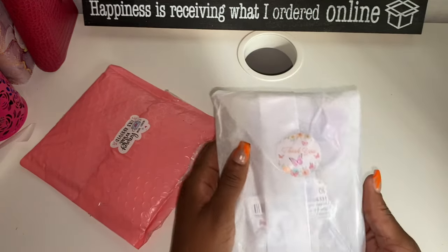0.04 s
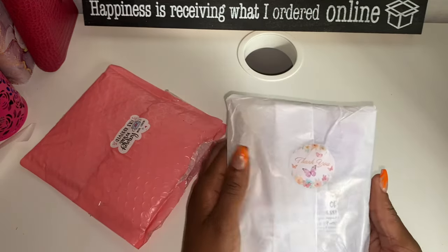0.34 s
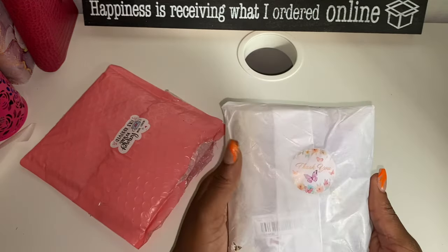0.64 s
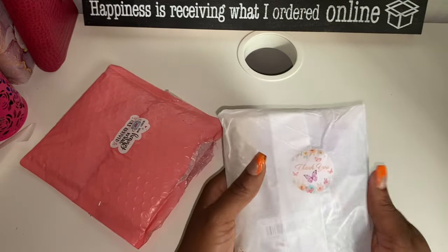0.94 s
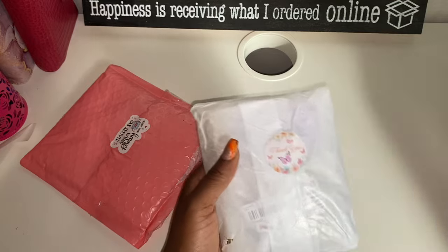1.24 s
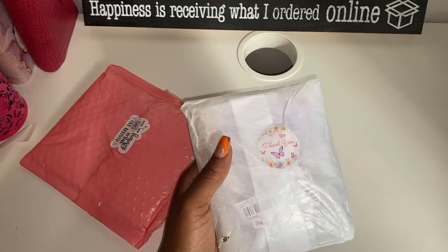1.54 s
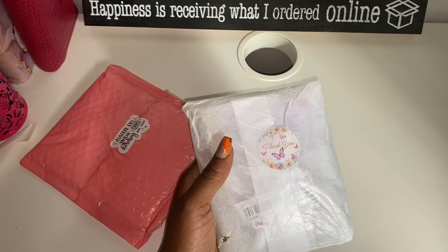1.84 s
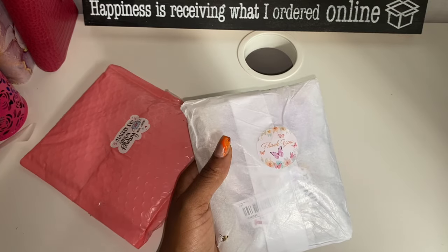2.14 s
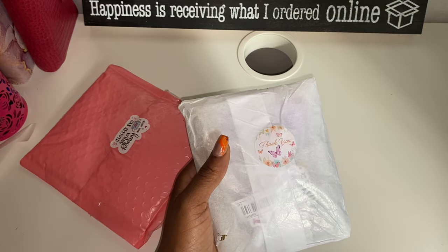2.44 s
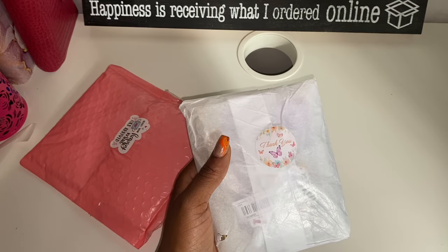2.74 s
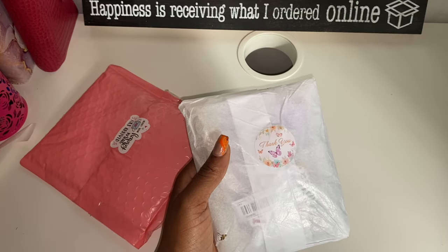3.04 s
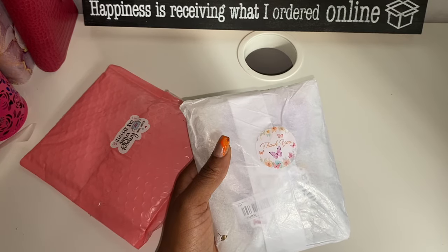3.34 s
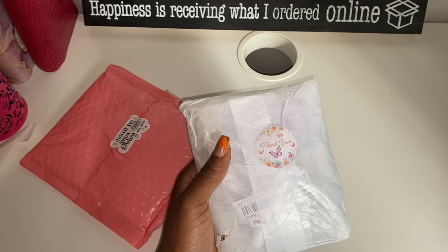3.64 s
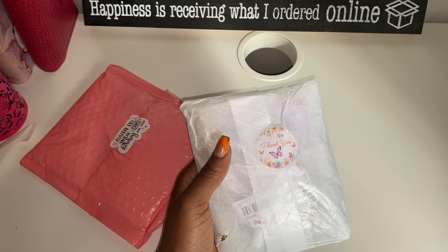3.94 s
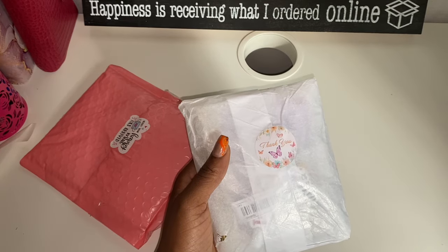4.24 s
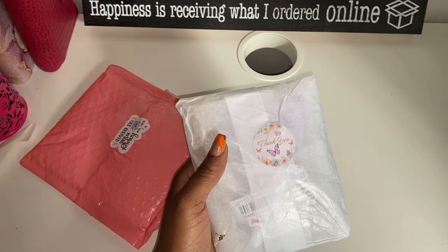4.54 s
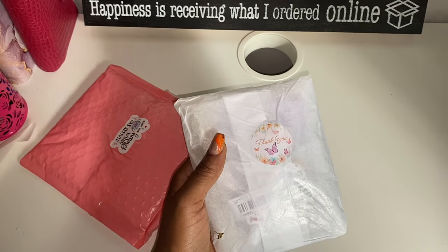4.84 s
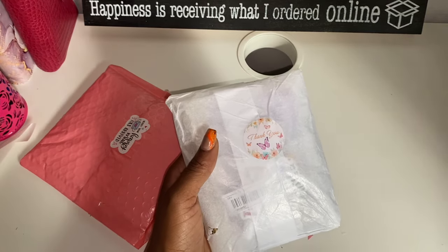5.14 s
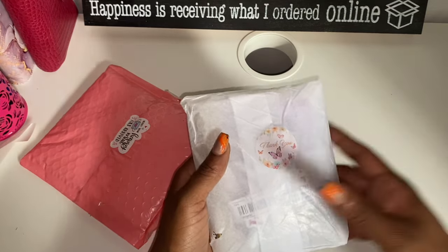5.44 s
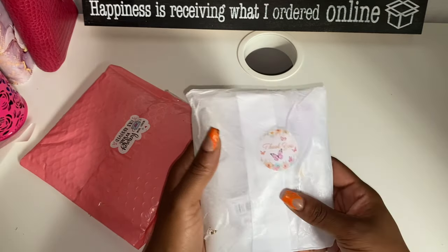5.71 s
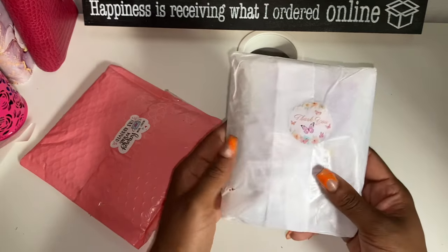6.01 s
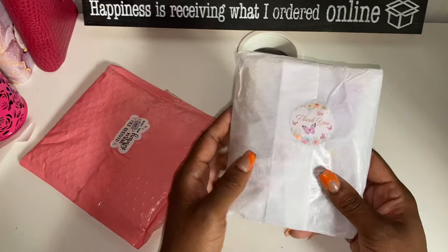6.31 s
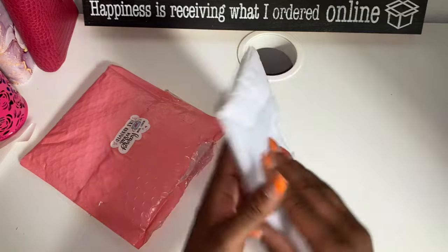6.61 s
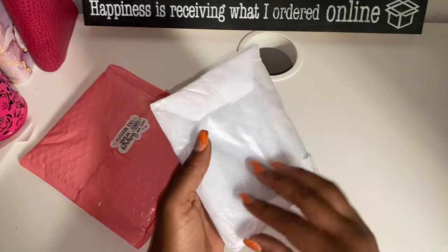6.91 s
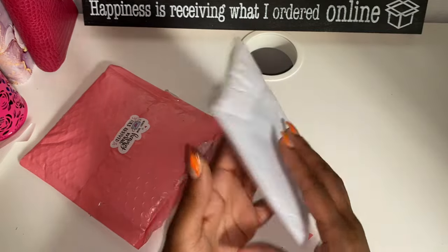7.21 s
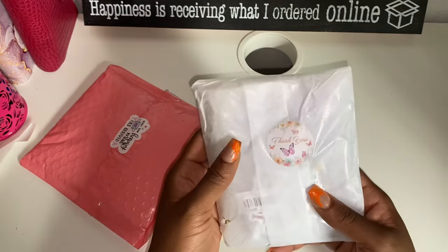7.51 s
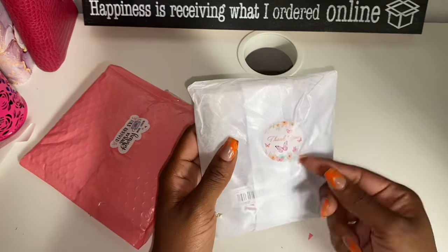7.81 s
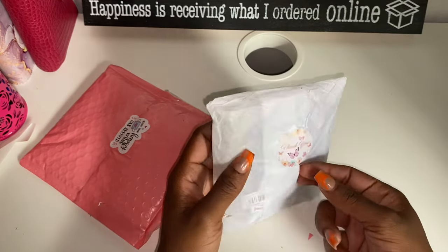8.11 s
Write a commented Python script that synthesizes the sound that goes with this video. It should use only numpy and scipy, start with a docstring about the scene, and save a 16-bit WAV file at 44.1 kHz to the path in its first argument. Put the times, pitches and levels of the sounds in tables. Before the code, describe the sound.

Hands squeeze a soft parcel wrapped in tissue paper, making it hiss, crinkle and snap. Something knocks onto a desk and slides briefly. A quiet stretch follows, with faint swishes, a scuff and a few small knocks. Then the parcel is turned over, crackling again, bumps softly on the desk and keeps rustling. It is all close to a stereo microphone in a small room with a low rumble.

```python
"""A soft parcel in tissue paper is squeezed over a desk, close to a stereo microphone, in a small room
with a low rumble. Fingers hiss over the sheet, creases buckle in swarms of clicks and larger folds snap.
At 1.5 s the free hand knocks something onto the desk and pushes it along. The parcel then rests in one
hand, amid faint swishes, dull swells, a scuff and a few knocks. From 5.4 s it is turned over and back,
crackling again, and bumps down at 7 s; the level dips briefly twice and the rustling goes on."""
import sys
import numpy as np
from scipy import signal
from scipy.fft import rfft, irfft, next_fast_len
from scipy.io import wavfile
from scipy.ndimage import uniform_filter1d

SR = 44100
rng = np.random.default_rng(int(sys.argv[2]) if len(sys.argv) > 2 else 0)


def transcribe(signal):
    """Save signal, clipped to [-1, 1], as a 16-bit WAV file at the path in sys.argv[1]."""
    frames = np.atleast_2d(signal).T
    limited = np.clip(frames, -1, 1)
    pcm = np.round(limited * 32767).astype(np.int16)
    wavfile.write(sys.argv[1], SR, pcm)


N = 364266
TIME = np.arange(N) / SR


def from_db(db):
    """Decibels to gain."""
    return 10 ** (np.asarray(db) / 20)


def rms_one(x):
    """Scale to an rms of one."""
    return x / np.sqrt(np.mean(x ** 2) + 1e-20)


def at_hz(points, size):
    """Read a frequency curve on the bins of an FFT."""
    hz, value = np.transpose(points)
    return np.interp(np.log(np.arange(size // 2 + 1) * SR / size + 1), np.log(hz), value)


def colour(x, spectrum):
    """Shape a signal with a smooth EQ curve."""
    size = next_fast_len(x.shape[-1] + 2048)
    return irfft(rfft(x, size) * from_db(at_hz(spectrum, size)), size)[..., :x.shape[-1]]


def low_pass(x, hz):
    """Second-order low-pass."""
    return signal.sosfilt(signal.butter(2, min(hz, .45 * SR), fs=SR, output="sos"), x)


def treble(x, hz):
    """The part of a signal above a frequency, in phase with the whole."""
    return x - signal.sosfiltfilt(signal.butter(2, min(hz, .45 * SR), fs=SR, output="sos"), x)


def resonate(x, hz, width_hz):
    """Two-pole resonance with unity gain at its peak."""
    r = np.exp(-np.pi * width_hz / SR)
    poles = [1, -2 * r * np.cos(2 * np.pi * hz / SR), r * r]
    return signal.lfilter(np.array([1, 0, -1]) * (1 - r * r) / 2, poles, x)


def fade(t60, size):
    """Exponential decay, 60 dB down after t60 seconds."""
    return from_db(-60 * TIME[:size] / t60)


def lingering(energy, t60):
    """Give the energy of every click a decaying tail."""
    r = from_db(-120 / (t60 * SR))
    return signal.lfilter([1 - r], [1, -r], energy + 1e-18)


def wander(per_s):
    """A random drift gliding between values of spread one."""
    return np.interp(TIME * per_s, np.arange(1024), rng.standard_normal(1024))


def envelope(strokes, attack_s, release_db_per_s):
    """Each stroke rises, swells or sags evenly, then dies away; overlaps add in power."""
    power = np.full(N, 1e-14)
    for start, length, db, swell_db in strokes:
        span = slice(max(int(start * SR), 0), int((start + length + 1) * SR))
        age = TIME[span] - start
        held_db = db + swell_db * (np.clip(age / length, 0, 1) - .5)
        released_db = release_db_per_s * np.maximum(age - length, 0)
        power[span] += (np.clip(age / attack_s, 0, 1) * from_db(held_db - released_db)) ** 2
    return np.sqrt(power)


def add(out, start_s, sound):
    """Mix a sound in at a time."""
    at = int(np.clip(start_s * SR, 0, N - 1))
    out[:, at:at + sound.shape[1]] += sound[:, :N - at]


# Tone of the rumble and of the room's hiss. Each row: frequency in Hz, gain in dB.
RUMBLE_EQ = [(20, -52), (33, -24.5), (43, -12), (53, 4.5), (70, 2.5), (88, -9), (125, -12.5), (170, -23.5),
             (280, -26.5), (450, -30), (900, -63.5)]
AIR_EQ = [(100, -1.5), (400, -8.5), (800, -10), (1800, -15.5), (2500, -17.5), (5000, -21.5), (9000, -26),
          (13000, -29.5), (16000, -52.5)]
# The rumble's fader ride. Each row: time in seconds, level in dB.
RUMBLE_RIDE = [(0.0, -58), (0.6, -54), (0.88, -64.5), (1.15, -53.5), (2.5, -59.5), (3.98, -59.5),
               (4.09, -69), (4.35, -56.5), (5.38, -59.5), (5.61, -55), (6.35, -61.5), (7.29, -55),
               (7.38, -64.5), (8.26, -66)]
# Its short surges. Each row: centre in seconds, rise in dB.
RUMBLE_SURGES = [(0.369, 5.8), (2.292, 4.8), (3.01, 7.5), (3.56, 4.3), (3.93, 4.7), (4.32, 8.3),
                 (4.79, 7.7), (5.64, 2.6), (7.27, 3.5)]


def room_tone(rumble_db, air_db, throb_db=2.2, surge_s=.035):
    """The building rumbles with an uneven throb, under the faint hiss of the room."""
    rumble = rms_one(colour(rng.standard_normal((2, N)), RUMBLE_EQ))
    steady = rumble / np.sqrt(uniform_filter1d(rumble ** 2, size=11000))
    ride_db = np.interp(TIME, *np.transpose(RUMBLE_RIDE)) + throb_db * wander(13)
    surge_db = sum(db * np.exp(-((TIME - centre) / surge_s) ** 2) for centre, db in RUMBLE_SURGES)
    air = rms_one(colour(rng.standard_normal((2, N)), AIR_EQ))
    return from_db(ride_db + surge_db + rumble_db) * steady + from_db(air_db) * air


def crinkle(per_s, spread_db=.5, ring_db=16, q=4.5, crack_t60=.005, flutter_db=-4, flutter_t60=.04):
    """Tiny facets buckle in a swarm: each gives a crack, a brief flutter of the sheet and a ring."""
    pitches = np.geomspace(900, 6500, 26)
    buckles = rng.random(N) < per_s / SR
    energy = buckles * from_db(spread_db * np.clip(rng.standard_normal(N), -2, 2)) ** 2
    pitch_index = rng.integers(0, len(pitches), N)
    noise = rng.standard_normal((2, N))
    swarm = 0
    for k, hz in enumerate(pitches):
        clicks = energy * (pitch_index == k)
        power = lingering(clicks, crack_t60) + from_db(flutter_db) ** 2 * lingering(clicks, flutter_t60)
        burst = np.roll(noise, k * N // len(pitches), axis=1) * np.sqrt(power)
        swarm = swarm + burst + from_db(ring_db) * resonate(burst, hz, hz / q)
    # even out the swarm so that the hand, not chance, sets its level
    local_power = np.abs(uniform_filter1d(np.mean(swarm ** 2, axis=0), size=1500))
    return swarm / np.sqrt(local_power + 1e-9)


def creases(per_s=110, spread_db=3, t60=.006, pitch_count=8):
    """Small creases give way one by one, in sharp pitched clicks that stand out of the swarm."""
    buckles = rng.random(N) < per_s / SR
    energy = buckles * from_db(spread_db * np.clip(rng.standard_normal(N), -2, 1)) ** 2
    pitch_index = rng.integers(0, pitch_count, N)
    noise = rng.standard_normal((2, N))
    clicks = 0
    for k, hz in enumerate(np.geomspace(1100, 5500, pitch_count)):
        burst = noise * np.sqrt(lingering(energy * (pitch_index == k), t60))
        clicks = clicks + burst + resonate(burst, hz, hz / 2)
    return rms_one(clicks)


def taut_panels(sheet, ring_db=-21, width_hz=170):
    """Taut panels of the sheet each ring at their own pitch, drifting in and out."""
    out = sheet
    for hz in np.geomspace(1400, 5600, 9):
        drift_db = 7 * np.clip(wander(9), -2, 1.5)
        out = out + from_db(ring_db + drift_db) * resonate(sheet, hz, width_hz)
    return out


# Tone of the tissue. Each row: frequency in Hz, gain in dB.
TISSUE_EQ = [(100, -22), (250, -2.5), (380, -1), (600, -5.5), (850, -1), (1050, -5.5), (1500, -5.5),
             (2300, -3), (3500, -5), (6000, -6.5), (9000, -1.5), (12000, -4), (16000, -7)]
# Fingers on the paper: squeezing, resting, then turning the parcel. Each row: start in seconds, length
# in seconds, level in dB, swell in dB, hollow body in relative dB, crispness in relative dB.
FINGER_STROKES = [ (0, 0.23, -46.5, -3, -2.5, 0), (0.247, 0.12, -49.5, 5.5, 0.5, 3),
                  (0.329, 0.087, -42, 0.5, 3, 3), (0.421, 0.16, -50.5, 2.5, 3, 3),
                  (0.622, 0.052, -50.5, -2.5, 3.5, -0.5), (0.701, 0.059, -47, 5, 2.5, 1),
                  (0.782, 0.13, -49, -2.5, 1.5, -0.5), (0.874, .16, -43, 9.5, -0.5, 2),
                  (1.038, 0.12, -50.5, -6.5, 7, 2.5), (1.206, 0.095, -66.5, 4, -2, 3),
                  (1.32, 0.18, -73, -0.5, -30, -4), (2.051, 0.075, -71, 0, 16, -18),
                  (2.736, 0.094, -76.5, 0, -9, -15), (2.909, 0.0096, -73, 2.5, 7, -6),
                  (4.727, 0.026, -48, -13.5, 10, 10), (4.806, 0.14, -69, -3, 10.5, 2),
                  (5.41, 0.021, -44.5, 7.5, 0.5, -0.5), (5.435, 0.041, -53.5, 1, -2, 6.5),
                  (5.474, 0.097, -44, -2, -4, 2.5), (5.567, 0.071, -44.5, 4, 2.5, 3),
                  (5.679, 0.07, -48, -8, -0.5, 1.5), (5.75, 0.12, -45, 10, 1.5, 2.5),
                  (5.883, 0.105, -49, 4, 6.5, 3), (6.019, 0.104, -51.5, 2, 0.5, 1.5),
                  (6.123, 0.063, -43, -0.5, -1, 4.5), (6.223, 0.16, -54.5, -4.5, 5.5, 2),
                  (6.402, 0.26, -51.5, -1.5, 1.5, 1), (6.498, .105, -40, 1.5, -1, 1),
                  (6.603, 0.113, -43.5, -1, 1.5, 3), (6.713, 0.073, -48, 1.5, 4.5, 5),
                  (6.804, 0.17, -52, 2.5, 0, 1.5), (7.007, 0.157, -50, -2.5, 5, 4),
                  (7.167, 0.2, -45, 1.5, -1.5, 0), (7.366, 0.053, -46.5, -1.5, -2, 5),
                  (7.514, 0.031, -47.5, 4, 1, 3), (7.54, 0.11, -50.5, 2.5, -3.5, 4.5),
                  (7.707, .05, -79.5, 16, -12, 9.5), (7.784, 0.05, -54.5, 6, -28, -4),
                  (7.857, 0.037, -54.5, 3, 0, -2), (7.975, 0.0314, -57, 14.5, -3.5, -2),
                  (8.032, .215, -51.5, 4.5, -2, 2)]


def rustle(facets_per_s, gain_db, uneven_db, usual_grip_db=-48.5):
    """Fingers slide and catch unevenly; a firmer grip buckles more facets and makes the sheet crunch."""
    start, length, db, swell_db, body_db, crisp_db = np.transpose(FINGER_STROKES)
    body, grip, crisp = [
        envelope(zip(start, length, db + band_db, swell_db), attack_s=.011, release_db_per_s=420)
        for band_db in (body_db, 0, crisp_db)]
    firmness_db = np.clip(20 * np.log10(grip) - usual_grip_db, -25, 10)
    swarm = crinkle(facets_per_s * from_db(.37 * firmness_db))
    hiss = from_db(-9) * rng.standard_normal((2, N))
    sheet = swarm + hiss + from_db(-5.5) * creases()
    sheet = rms_one(colour(taut_panels(sheet), TISSUE_EQ))
    upper, top = treble(sheet, 980), treble(sheet, 6500)
    lows, mids = sheet - upper, upper - top
    crunch = from_db(-21 + .73 * firmness_db) * resonate(sheet, hz=2200, width_hz=490)
    catching = from_db(gain_db + uneven_db * wander(110))
    return catching * (body * lows + grip * (mids + crunch) + crisp * top)


# Tone of the snaps. Each row: frequency in Hz, gain in dB.
SNAP_EQ = [(100, -15), (400, -12.5), (1000, -2.5), (2500, -8.5), (5000, -6), (10000, -0.5), (16000, -6)]
# Folds that snap. Each row: start in seconds, level in dB, ring in Hz, crispness in relative dB.
FOLD_SNAPS = [(0.051, -22, 2490, -19), (0.1202, -20, 3370, -9), (0.133, -24.5, 1420, -29),
              (0.2012, -14, 2880, -18), (0.212, -25, 3000, -14), (0.2401, -32, 3000, -10),
              (0.244, -33, 2500, -10), (0.266, -38, 3500, -8), (0.2728, -25.5, 2820, -10),
              (0.347, -27.5, 1480, -10), (0.363, -25, 2570, -13), (0.512, -30, 2000, -9),
              (0.532, -30, 1500, -13), (0.55, -21.5, 4660, -24), (0.565, -32, 3000, -30),
              (0.5804, -29, 3000, -15), (0.626, -31.5, 900, -27), (0.709, -32, 2500, -10),
              (0.744, -30, 1510, -21), (0.8489, -19.5, 720, -22), (0.8841, -15, 3050, -12),
              (0.895, -16, 3080, -22), (0.904, -22, 1300, -24), (0.989, -12, 2680, -12.5),
              (1.02, -20.5, 1260, -15), (1.031, -15.5, 3240, -25), (1.054, -21.5, 1250, -10),
              (1.081, -26.5, 4800, -17), (1.114, -18, 2540, -12), (1.1513, -25.5, 2500, -12),
              (1.1557, -24.5, 3570, -29), (1.255, -36, 2130, -16), (1.626, -34.5, 2130, -9),
              (1.643, -27, 2400, -2), (1.653, -32, 2410, -2), (1.664, -27.5, 2220, -5),
              (1.79, -24, 1700, -8), (2.035, -24.5, 3500, -19), (2.0372, -18, 2860, -37),
              (2.051, -29, 2420, -27), (2.115, -34.5, 3500, -16), (2.135, -41, 1200, -26),
              (2.541, -41, 1820, -20), (2.756, -45, 2450, -29), (2.795, -47.5, 2300, -17),
              (2.836, -60, 2700, -32.5), (2.925, -53, 3630, -16), (3.507, -57, 3000, -33.5),
              (4.734, -22.5, 5740, -2), (4.837, -34, 1900, -30), (4.864, -31, 1900, -18),
              (4.931, -19, 4470, -27), (5.421, -18, 3800, -15.5), (5.5756, -24, 2510, -12),
              (5.5785, -25, 2000, -13), (5.6197, -15.5, 1980, -24), (5.6315, -13, 2300, -30),
              (5.638, -22.5, 1480, -11), (5.6458, -15, 2300, -30), (5.6813, -22, 2230, -22),
              (5.699, -26, 1800, -28), (5.711, -22, 2700, -21), (5.725, -32, 2200, -7),
              (5.739, -31, 2600, -10), (5.815, -18.5, 2030, -20), (5.834, -17.5, 2620, -20),
              (5.86, -21.5, 2310, -12), (5.871, -15, 2720, -14), (6.044, -24.5, 4860, -24),
              (6.081, -26.5, 2000, -26), (6.149, -29, 3000, -10), (6.161, -30, 1110, -16),
              (6.1812, -19.5, 2220, -23), (6.253, -42, 2000, -16), (6.267, -25.5, 2570, -7),
              (6.3064, -24.5, 3820, -12), (6.379, -33, 2500, -18), (6.4168, -20.5, 1900, -26),
              (6.426, -25, 2200, -6), (6.442, -28, 3000, -6), (6.466, -21, 2150, -4),
              (6.505, -16.5, 4180, -16), (6.542, -19, 3000, -14), (6.551, -12, 2670, -16),
              (6.5767, -14, 2480, -22), (6.596, -18, 2340, -25), (6.7714, -31, 1500, -8),
              (6.78, -26, 2000, -16), (6.847, -29, 2770, -10), (6.854, -22, 3000, 13),
              (6.8833, -30, 3000, -8), (6.978, -22.5, 2020, -10.5), (7.023, -24.5, 1700, -21),
              (7.062, -26, 4720, -6), (7.148, -22, 4500, -4), (7.1847, -20.5, 2400, -28),
              (7.1942, -12.5, 2680, -26), (7.1989, -15, 2070, -14.5), (7.225, -19.5, 2100, -16),
              (7.2865, -14, 2450, -28), (7.319, -20, 1290, -28), (7.35, -13, 3400, -24),
              (7.3736, -19, 2300, -29), (7.386, -20, 2000, -23), (7.43, -15.5, 2210, -13.5),
              (7.446, -39, 2500, -14), (7.499, -47, 2500, -12), (7.534, -30, 2000, -19),
              (7.623, -18.5, 2200, -10), (7.6277, -20, 1900, -9), (7.673, -22.5, 2200, -19),
              (7.77, -48, 2800, -13), (7.7998, -29, 2980, -30), (7.806, -36, 2800, -20),
              (7.924, -31, 3200, -13), (8.0075, -29, 2400, -15), (8.0481, -24.5, 2200, -10),
              (8.0764, -28.5, 2600, -13), (8.108, -22, 3200, -13.5), (8.153, -23, 2000, -14),
              (8.232, -25, 3000, -12)]


def snaps(gain_db, crack_db, edge_db, flutter_db, q, rise_s=.00055, size=1024):
    """A larger fold flips with a centred kick and a flutter, ringing over a crack and a crisp edge."""
    out = np.zeros((2, N))
    age = TIME[:size] / rise_s
    shape = age * np.exp(1 - age) + from_db(flutter_db) * fade(.025, size)
    shared_kick = 9 * (np.arange(size) == 12) * [[1], [0]]
    for start, db, hz, crisp_db in FOLD_SNAPS:
        burst = rng.choice([-1, 1], (2, size)) * shape
        ring = resonate(burst + shared_kick, hz, hz / q)
        ring = rms_one(resonate(ring, hz, hz / q))
        crack = from_db(crack_db) * rms_one(low_pass(burst, max(2 * hz, 3000)))
        edge = from_db(min(crisp_db + edge_db, 4)) * rms_one(treble(burst, 5800))
        snap = ring + crack + edge
        balanced = snap * snap.std() / snap.std(axis=1, keepdims=True)
        add(out, start, from_db(db + gain_db) * balanced / np.sqrt(size))
    return colour(out, SNAP_EQ)


def desk_echo(paper, echo_db, delay_ms=1.8, swing_ms=.35):
    """The desk top mirrors the paper; the comb it makes shifts as the parcel moves."""
    delay = np.clip(delay_ms + swing_ms * wander(2), .3, 4) * SR / 1000
    mirrored = np.array([np.interp(np.arange(N) - delay, np.arange(N), row) for row in paper])
    return paper + from_db(echo_db) * mirrored


def struck(modes, scatter_db, size=16384):
    """Every blow sets the modes ringing with new strengths; neighbours swing in opposite senses."""
    ring = 0
    phases = [[0], [np.pi / 2]]
    for k, (hz, db, t60) in enumerate(modes):
        strength = from_db(db + scatter_db * rng.standard_normal((2, 1))) * (-1) ** k
        ring = ring + strength * np.sin(2 * np.pi * hz * TIME[:size] + phases) * fade(t60, size)
    return ring / np.abs(ring).max()


# Low modes of a thud. Each row: pitch in Hz, level in dB, 60 dB decay in seconds.
THUD_MODES = [(116, -1, .06), (146, 1, .07), (245, -6, .04), (295, -1, .05), (344, -1, .05), (390, -4, .06),
              (460, -12, .03)]
# Soft thuds on the desk. Each row: start in seconds, level in dB.
DESK_THUDS = [(0.852, -47), (1.026, -46), (1.515, -46.5), (1.716, -46), (5.145, -46), (5.837, -60.5),
              (7.001, -38), (7.042, -27.5)]


def thuds(gain_db):
    """Soft, dull thuds on the desk, from the parcel or the pushed thing."""
    out = np.zeros((2, N))
    for start, db in DESK_THUDS:
        thud = low_pass(struck(THUD_MODES, scatter_db=2.5), hz=720)
        add(out, start, from_db(db + gain_db) * thud)
    return out


def rub(strokes, resonances, gain_db, rough_db, attack_s, release_db_per_s, pitch_waver=.025):
    """Uneven friction feeds the resonances of a sliding thing; they waver as the contact moves."""
    friction = rng.standard_normal((2, N)) * from_db(rough_db * wander(60))
    ring = sum((-1) ** k * from_db(db) * resonate(friction, hz, width)
               for k, (hz, width, db) in enumerate(resonances))
    playhead = np.cumsum(1 + pitch_waver * wander(14)) % (N - 1)
    wavering = np.array([np.interp(playhead, np.arange(N), row) for row in ring])
    return from_db(gain_db) * envelope(strokes, attack_s, release_db_per_s) * rms_one(wavering)


# The hiss of the push. Each row: start in seconds, length in seconds, level in dB, swell in dB.
SLIDE_STROKES = [(1.477, 0.0068, -52, 11.5), (1.489, 0.04, -46, -9), (1.55, 0.089, -61.5, 9.5),
                 (1.62, 0.084, -55, -1), (1.70, 0.075, -48.5, -0.5), (1.81, .18, -51.5, -2),
                 (1.992, 0.0075, -44.5, -6)]
# Its bright resonances. Each row: centre in Hz, width in Hz, level in dB.
SLIDE_BANDS = [(1160, 430, -14), (1700, 200, -6), (2450, 640, -5.5), (3950, 800, -5.5), (5115, 1810, -4),
               (10560, 7900, -7.5)]


def slide():
    """Something pushed along the desk hisses softly."""
    return rub(SLIDE_STROKES, SLIDE_BANDS, gain_db=.1, rough_db=2.5, attack_s=.0044, release_db_per_s=413)


# The body of the push. Each row: start in seconds, length in seconds, level in dB, swell in dB.
DRAG_STROKES = [(1.488, 0.029, -42, -10.5), (1.54, 0.037, -66, -3), (1.61, 0.11, -58.5, 9),
                (1.74, 0.25, -67.5, -1)]
# Its hollow resonances. Each row: centre in Hz, width in Hz, level in dB.
DRAG_BANDS = [(363, 65, -0.5), (697, 150, -6), (852, 80, -5.5), (1383, 360, -12)]


def drag():
    """Friction draws a low, rough scrape from the thing as it is set down and pushed."""
    return rub(DRAG_STROKES, DRAG_BANDS, gain_db=4, rough_db=4.5, attack_s=.037, release_db_per_s=417)


# Modes of the desk top. Each row: pitch in Hz, level in dB, 60 dB decay in seconds.
DESK_MODES = [(362, -1, .11), (415, 0, .035), (516, -1, .025), (610, 3, .035), (694, 0, .055),
              (780, -9, .04), (855, -5, .07), (960, -5, .05), (1110, -6, .04), (1290, -6, .05),
              (1375, -8, .06), (1870, -8, .04), (2200, -10, .05)]
# Tone of the clack. Each row: frequency in Hz, gain in dB.
CLACK_EQ = [(100, -14), (250, -20.5), (380, -5), (900, -12.5), (1400, -18), (2800, -23.5), (4300, -5),
            (7000, -9), (16000, -22.5)]
# Knocks on the desk. Each row: start in seconds, level in dB, hardness as a cut-off in Hz.
DESK_KNOCKS = [(1.490, -28, 3500), (1.502, -30, 2500), (1.598, -37, 448), (1.715, -47, 595),
               (2.038, -50, 1500), (2.054, -48.5, 1490), (2.137, -48.5, 1170), (2.543, -58.5, 1510),
               (4.733, -44.5, 2500), (4.9295, -24, 1700)]


def knocks(gain_db, clack_db, clack_t60, tick_db, tick_t60, low_cut_hz, size=16384):
    """Hard things meet the stiff desk top with a tick and a clack, and set it ringing."""
    out = np.zeros((2, N))
    contact = from_db(clack_db) * fade(clack_t60, size) + from_db(tick_db) * fade(tick_t60, size)
    for start, db, hardness_hz in DESK_KNOCKS:
        clack = rms_one(colour(rng.standard_normal((2, size)), CLACK_EQ)) * contact
        ring = struck(DESK_MODES, scatter_db=2)
        add(out, start, from_db(db + gain_db) * low_pass(ring + clack, hardness_hz))
    return signal.sosfilt(signal.butter(2, low_cut_hz, "high", fs=SR, output="sos"), out)


# Two short rasps. Each row: start in seconds, length in seconds, level in dB, swell in dB.
RASP_STROKES = [(1.703, 0.052, -49, -0.5), (5.607, 0.011, -40, -5)]
# Their narrow resonances. Each row: centre in Hz, width in Hz, level in dB.
RASP_BANDS = [(1670, 120, -13), (2360, 160, 0), (3330, 120, -15), (4010, 150, -15), (5080, 150, -13)]


def rasps():
    """A sliding surface catches and rasps."""
    return rub(RASP_STROKES, RASP_BANDS, gain_db=1, rough_db=2.5, attack_s=.017, release_db_per_s=309)


# Thin swishes. Each row: start in seconds, length in seconds, level in dB, swell in dB.
SWISH_STROKES = [(2.295, 0.089, -74.5, 0), (4.56, 0.19, -80.5, 18), (4.73, 0.012, -58, -17),
                 (4.922, 0.024, -56.5, -8), (5.135, 0.039, -63.5, 3)]
# Their airy resonances. Each row: centre in Hz, width in Hz, level in dB.
SWISH_BANDS = [(3500, 830, -3.5), (4200, 640, -3), (5000, 1300, -3), (9890, 3600, -8.5)]


def swishes():
    """Light friction gives thin, high swishes."""
    return rub(SWISH_STROKES, SWISH_BANDS, gain_db=2, rough_db=3, attack_s=.012, release_db_per_s=265)


# Dull swells. Each row: start in seconds, length in seconds, level in dB, swell in dB.
SWELL_STROKES = [(3.08, 0.12, -70.5, 1), (3.79, 0.075, -66, -2.5), (4.23, 0.06, -71, -4),
                 (7.75, 0.48, -75.5, -6)]
# Their low resonances. Each row: centre in Hz, width in Hz, level in dB.
SWELL_BANDS = [(145, 23, 2), (228, 25, -2.5)]


def swells():
    """Faint, dull noise rises and falls behind the handling."""
    return rub(SWELL_STROKES, SWELL_BANDS, gain_db=2, rough_db=4.5, attack_s=.067, release_db_per_s=206)


# One scuff. Its row: start in seconds, length in seconds, level in dB, swell in dB.
SCUFF_STROKE = [(4.248, 0.032, -57, -3)]
# Its resonances. Each row: centre in Hz, width in Hz, level in dB.
SCUFF_BANDS = [(169, 120, -4), (395, 81, 4), (856, 140, -6.5), (1364, 240, -15), (1900, 160, -12),
               (2200, 52, -3)]


def scuff():
    """A short, rough rub on the desk makes a muffled scuff."""
    return rub(SCUFF_STROKE, SCUFF_BANDS, gain_db=-1, rough_db=5.5,
               attack_s=.0095, release_db_per_s=348.5)


def room(x, wet_db, wall_hz, low_t60=.26, treble_t60=.2, size=22050):
    """Dense reflections follow after a few milliseconds; the treble dies sooner."""
    noise = rng.standard_normal((2, size))
    bright = treble(noise, wall_hz)
    tail = (noise - bright) * fade(low_t60, size) + bright * fade(treble_t60, size)
    onset = np.clip((TIME[:size] - .002) / .00074, 0, 1)
    response = rms_one(tail * onset) / np.sqrt(size)
    return x + from_db(wet_db) * signal.oaconvolve(x, response, axes=1)[:, :N]


# Stereo image of near and of diffuse sound. Each row: frequency in Hz, left-right likeness (1 is alike).
NEAR_LIKENESS = [(100, 1), (300, .8), (550, .6), (1000, .88), (1800, .95), (2600, .65), (6200, .65),
                 (7000, .995), (7700, .995), (8600, .7), (9500, .7), (10000, .98), (11000, .98),
                 (12100, .6), (13000, .99), (13800, .99), (15000, .55)]
DIFFUSE_LIKENESS = [(90, 1), (200, .9), (400, .3), (4500, .3), (6200, .65), (7300, .97), (9000, .6),
                    (10500, .93), (12000, .5), (13400, .85), (16000, .1)]
# Phase across the microphone pair. Each row: frequency in Hz, lead of the left side in radians.
LEFT_LEAD = [(1800, 0), (2700, .45), (5300, .35), (6900, 2.9), (7700, 3.3), (9500, 5.2), (9900, 6.25),
             (11400, 6.35), (12900, 9.2), (14200, 9.6), (15800, 12.4)]


def microphone_pair(x, likeness):
    """Shared (row 0) and unshared (row 1) sound reach two ports, whose phase parts in the treble."""
    size = next_fast_len(N + 4096)
    shared, apart = rfft(x, size)
    alike = np.clip(at_hz(likeness, size), -1, 1)
    sides = np.array([[1], [-1]])
    pair = np.sqrt((1 + alike) / 2) * shared + sides * np.sqrt((1 - alike) / 2) * apart
    return irfft(pair * np.exp(.5j * sides * at_hz(LEFT_LEAD, size)), size)[:, :N]


def scene():
    """Paper and desk sit close up in the room, over a diffuse bed of room tone and swells."""
    paper = rustle(facets_per_s=1400, gain_db=2, uneven_db=2)
    paper += snaps(gain_db=6.5, crack_db=-3, edge_db=14, flutter_db=-14, q=1.94)
    paper = desk_echo(paper, echo_db=-10.5)
    desk = knocks(gain_db=.5, clack_db=1.5, clack_t60=.058, tick_db=2, tick_t60=.008, low_cut_hz=259)
    desk += thuds(gain_db=-2) + drag() + slide() + rasps() + swishes() + scuff()
    near = room(paper, wet_db=-13, wall_hz=6000) + room(desk, wet_db=-7.5, wall_hz=3000)
    bed = room_tone(rumble_db=1, air_db=-79.5) + swells()
    return microphone_pair(near, NEAR_LIKENESS) + microphone_pair(bed, DIFFUSE_LIKENESS)


# Brief dips in level. Each row: centre in seconds, length in seconds, depth in dB.
LEVEL_DIPS = [(7.337, 0.013, -20), (7.36, 0.015, -22)]


def record(dry, cutoff_hz=15900):
    """The level dips briefly twice, and the top of the band is cut steeply."""
    dip_db = sum(db * np.exp(-((TIME - centre) / (length / 2)) ** 4) for centre, length, db in LEVEL_DIPS)
    high_cut = signal.ellip(10, .2, 70, cutoff_hz, fs=SR, output="sos")
    return signal.sosfilt(high_cut, dry * from_db(dip_db))


dry = scene()
out = record(dry)
transcribe(out)
```